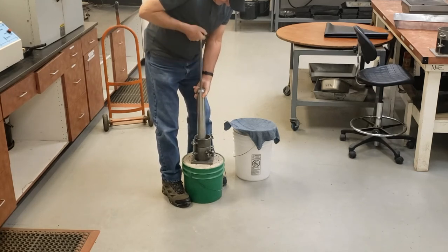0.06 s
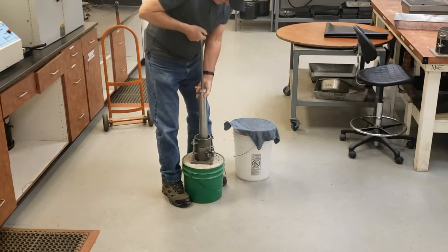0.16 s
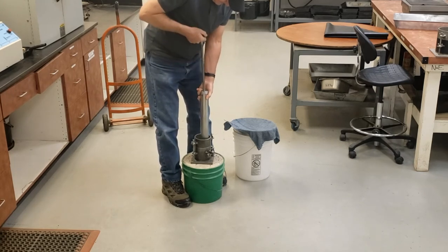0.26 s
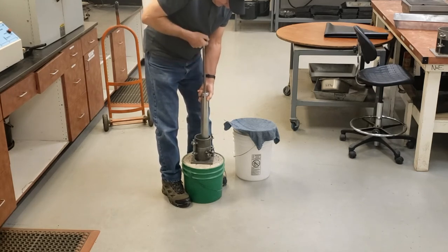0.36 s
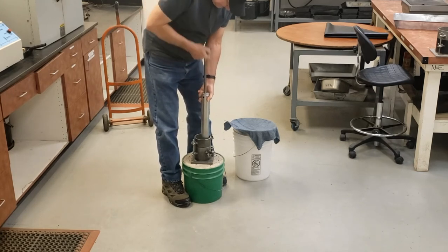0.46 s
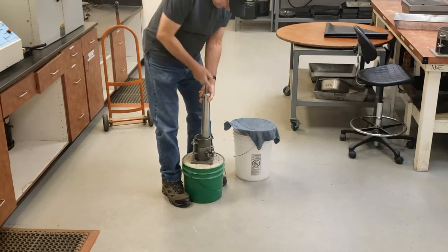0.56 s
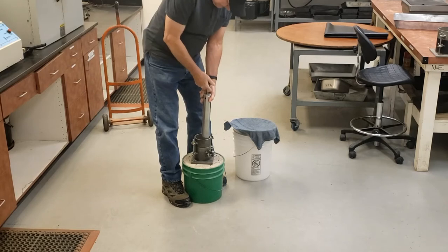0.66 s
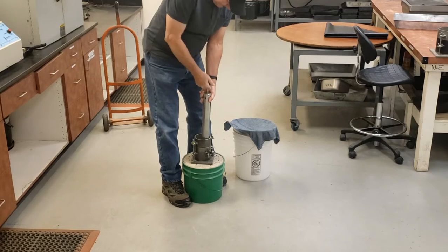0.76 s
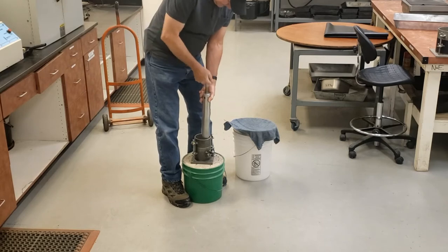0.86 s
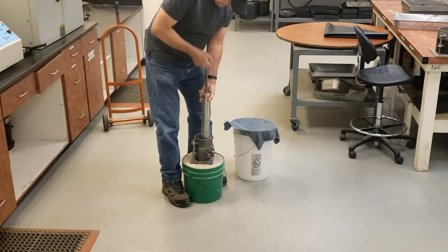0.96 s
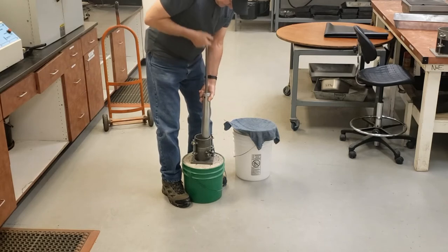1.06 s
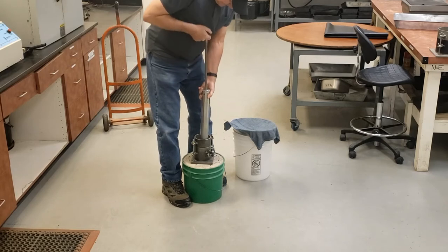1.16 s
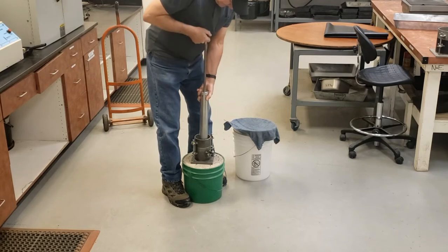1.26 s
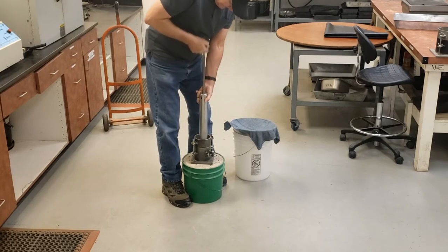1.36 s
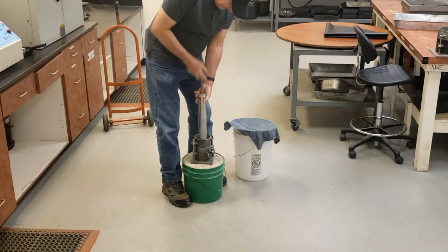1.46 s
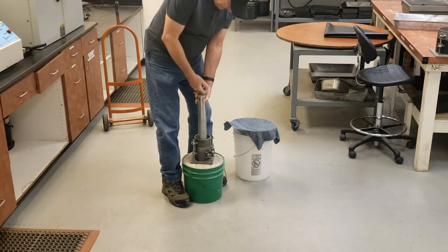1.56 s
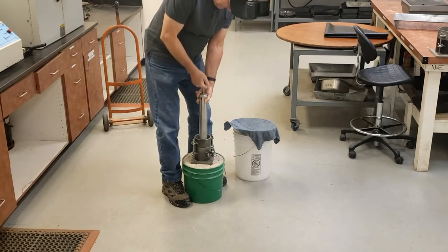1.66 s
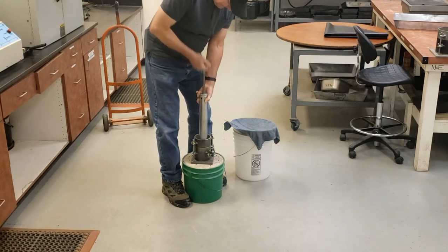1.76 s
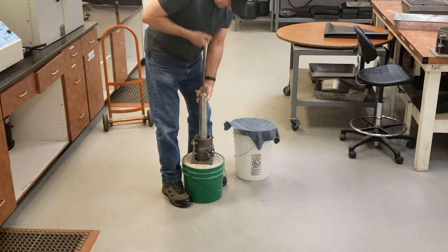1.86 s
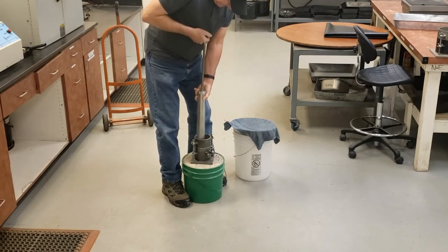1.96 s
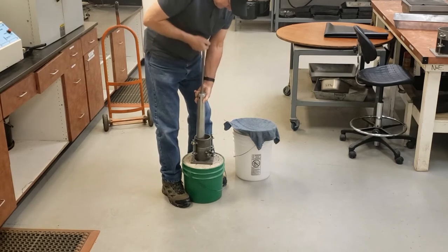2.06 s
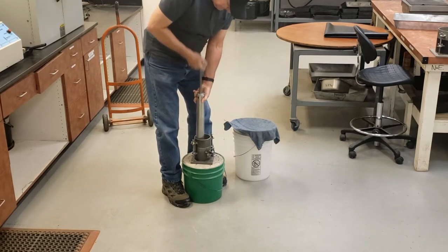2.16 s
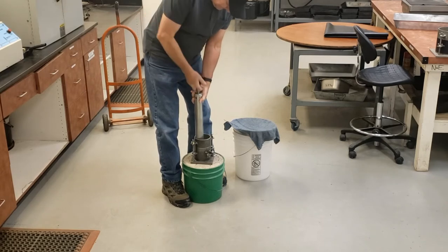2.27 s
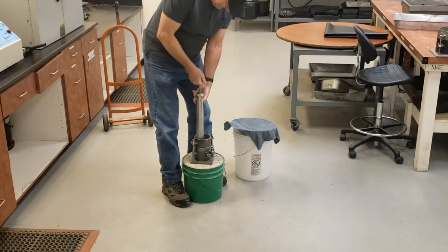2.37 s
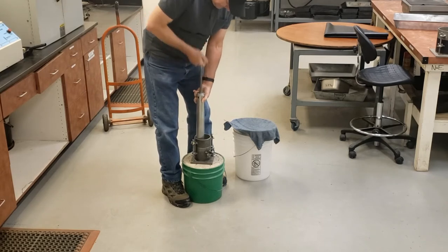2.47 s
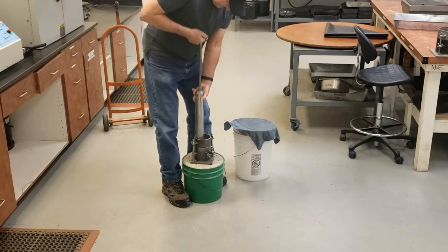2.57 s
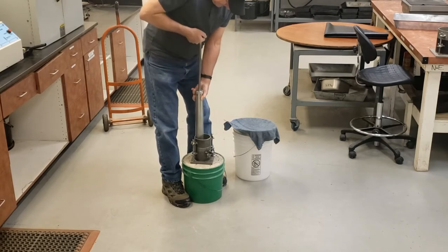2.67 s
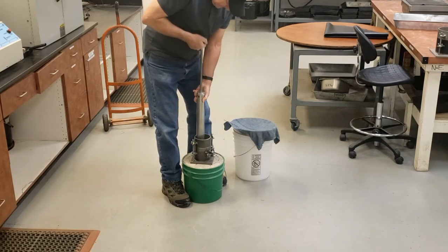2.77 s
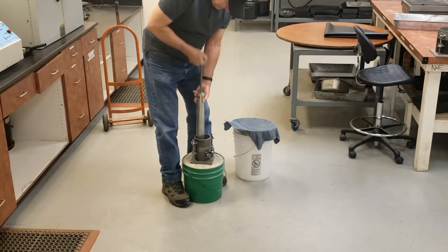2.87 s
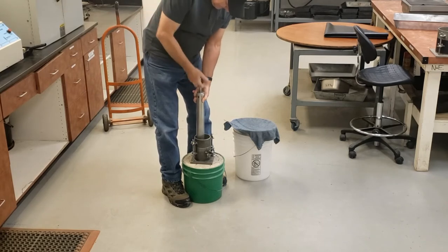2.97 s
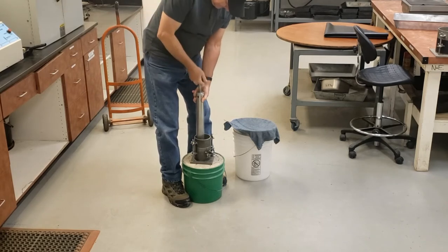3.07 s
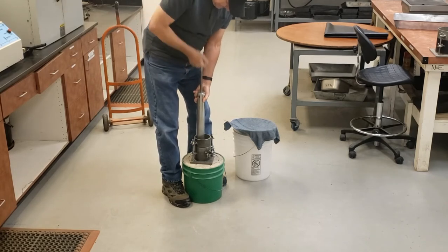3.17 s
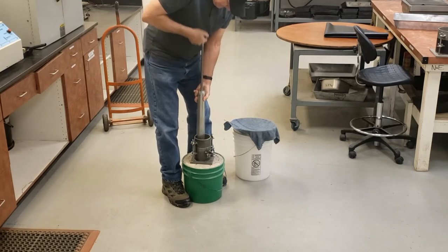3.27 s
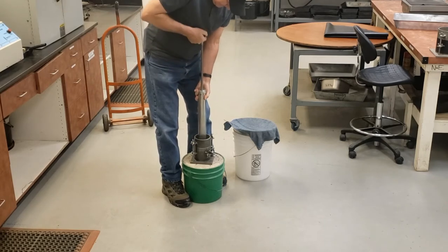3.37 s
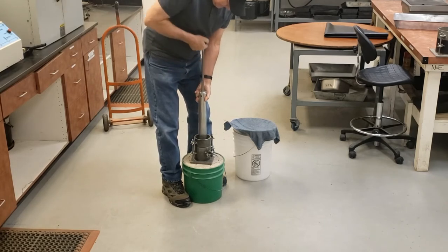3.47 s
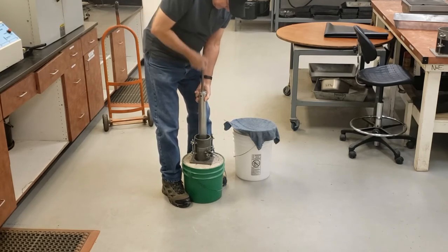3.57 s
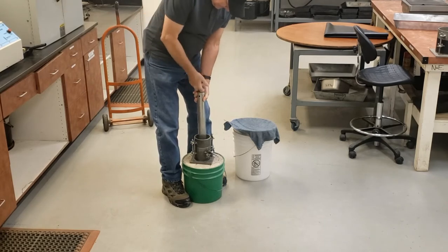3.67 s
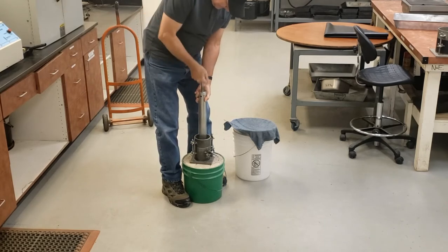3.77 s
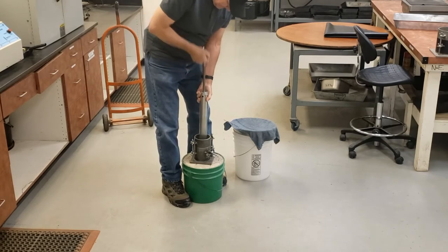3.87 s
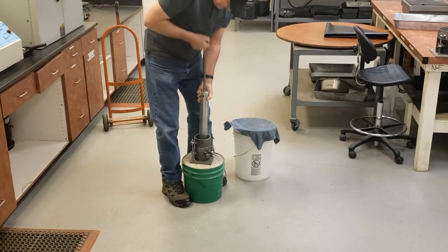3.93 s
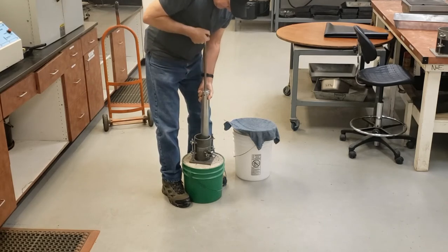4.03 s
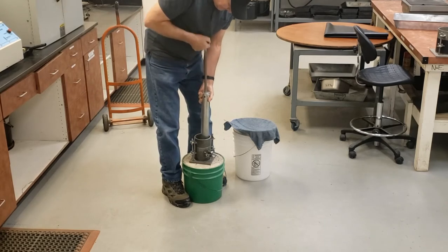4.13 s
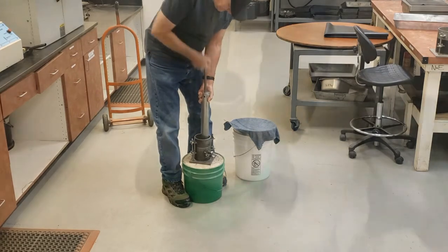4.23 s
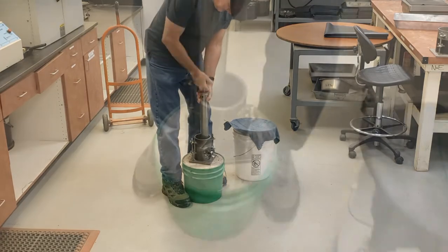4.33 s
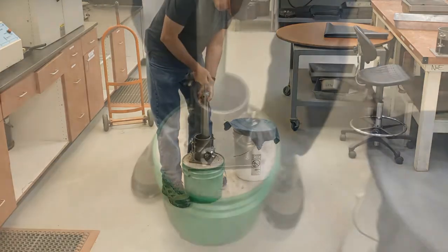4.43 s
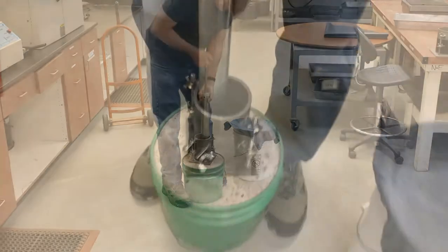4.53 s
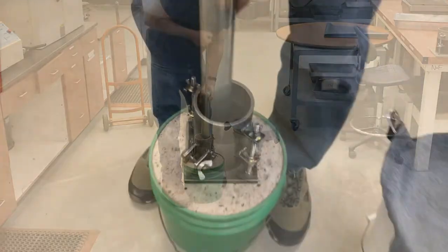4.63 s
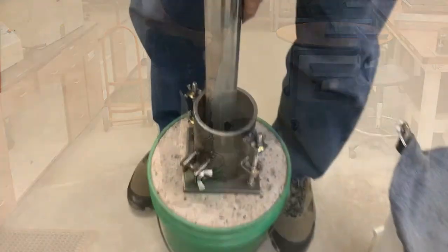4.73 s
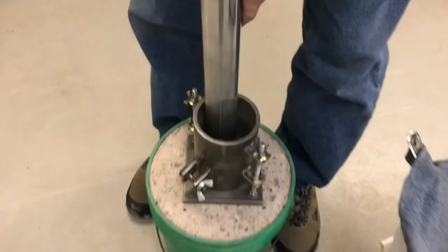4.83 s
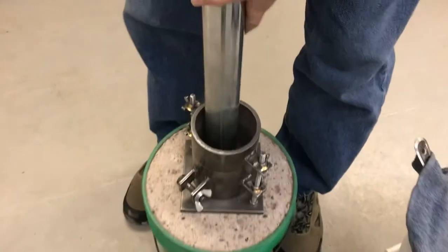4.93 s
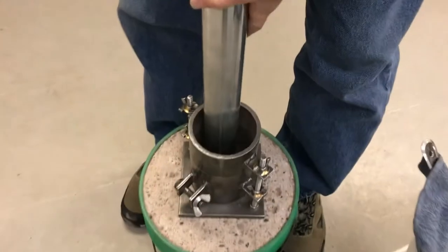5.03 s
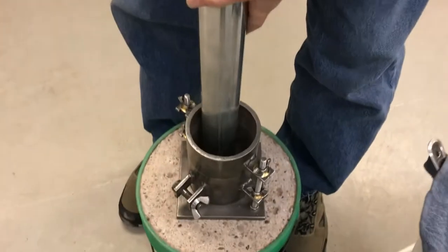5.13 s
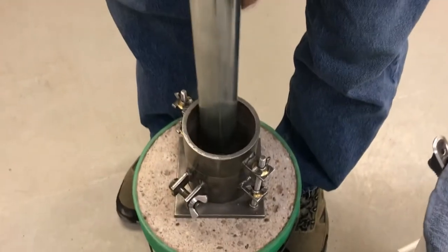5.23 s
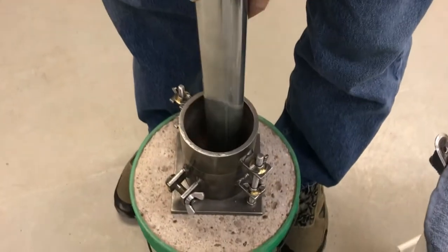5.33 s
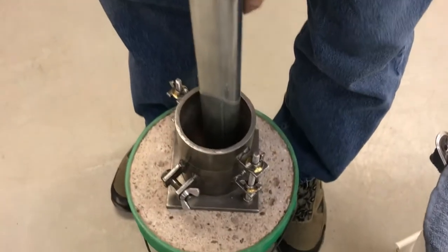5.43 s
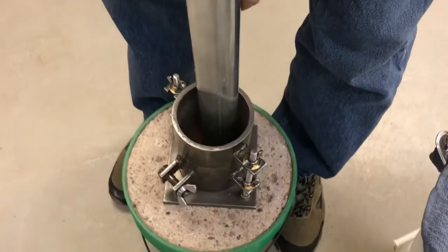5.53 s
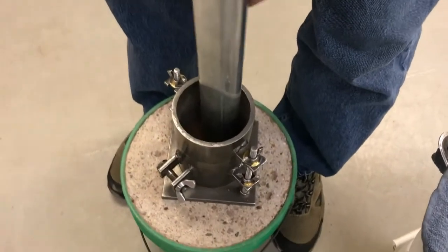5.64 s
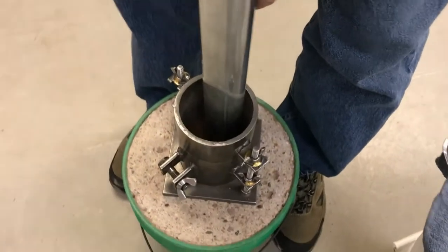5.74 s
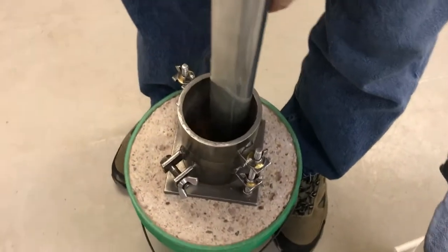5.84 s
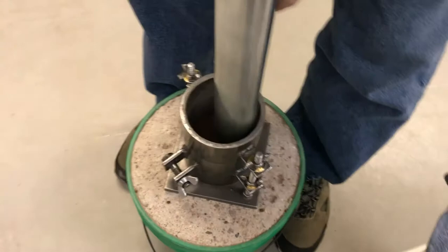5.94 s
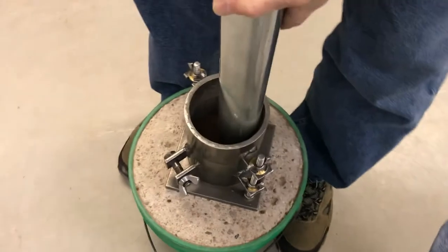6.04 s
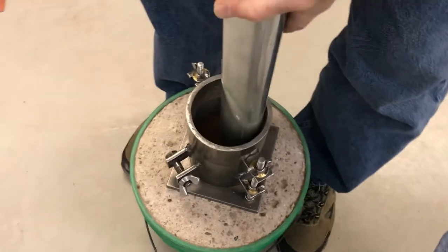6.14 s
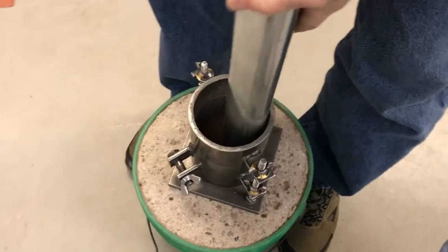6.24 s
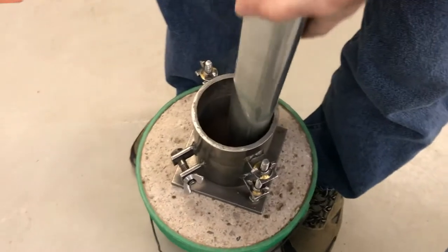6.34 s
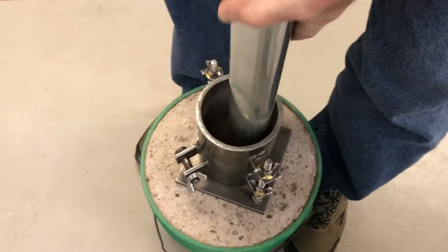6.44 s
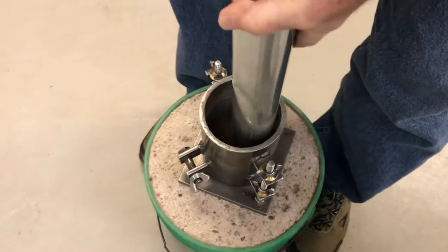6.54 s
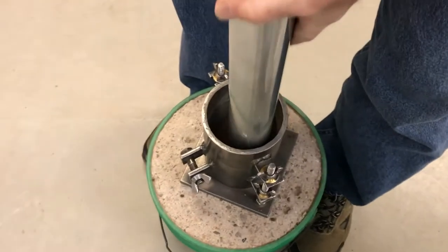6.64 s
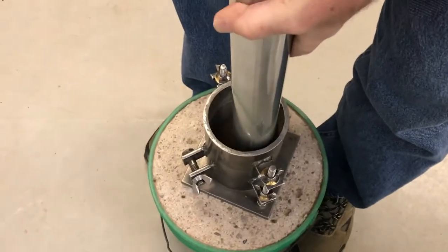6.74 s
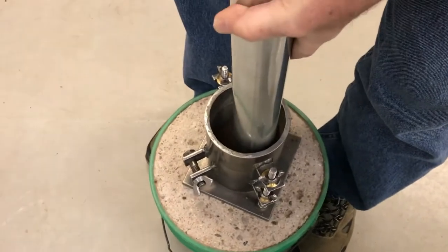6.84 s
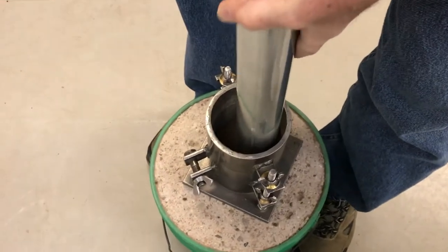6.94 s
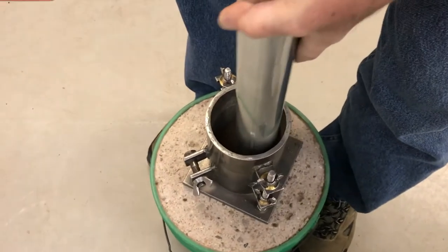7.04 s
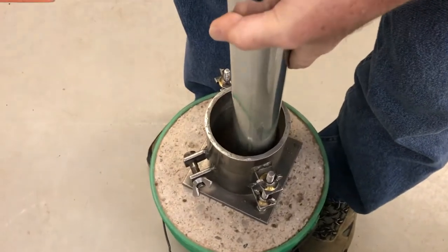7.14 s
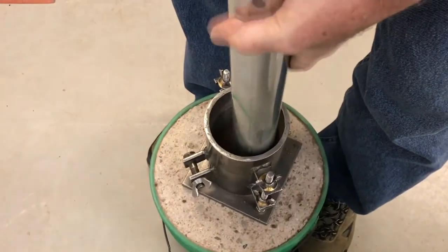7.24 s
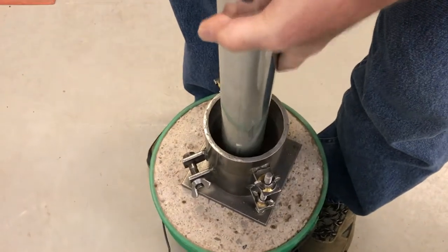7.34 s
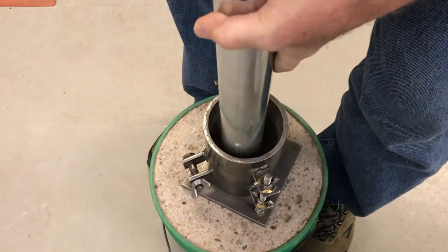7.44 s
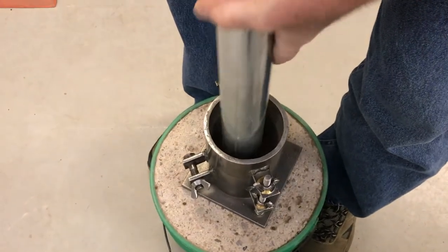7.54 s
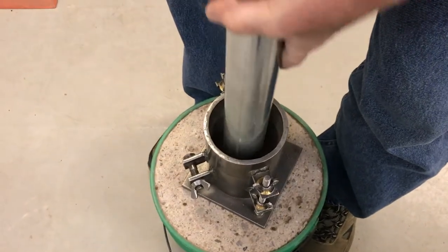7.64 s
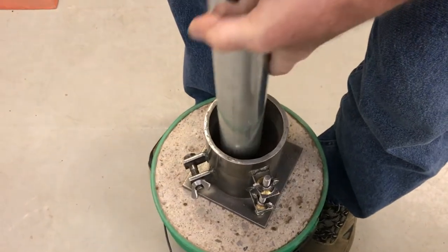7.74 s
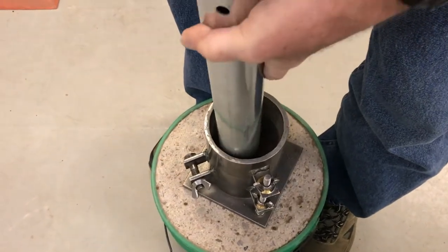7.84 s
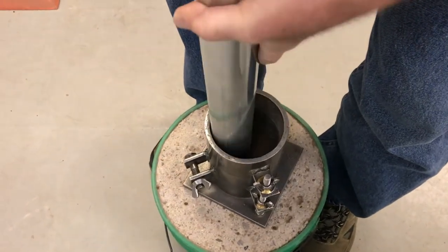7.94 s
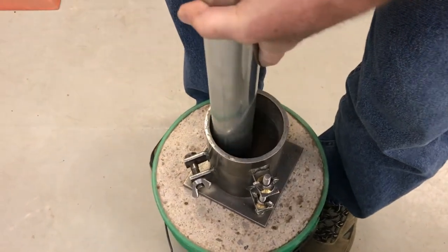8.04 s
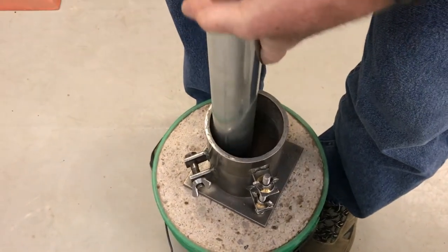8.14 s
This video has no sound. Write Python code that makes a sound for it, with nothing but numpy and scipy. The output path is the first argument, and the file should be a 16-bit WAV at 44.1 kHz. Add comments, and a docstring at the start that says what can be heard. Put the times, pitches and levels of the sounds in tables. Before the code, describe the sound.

Sharp steel clanks alternate with crunching thuds in an even rhythm as a sliding rammer weight is lifted and dropped onto soil in a metal mold. The first strokes sound wide and echoing from across a lab room, with a soft ventilation rumble underneath. Midway the microphone perspective fades to right above the mold, dry and mono, where the blows hit harder and the dusty scrapes, ticks and rattles stand out.

```python
"""A lab floor, where soil is compacted in a steel mold with a hand rammer, over ventilation noise.
Each cycle the weight scrapes up its guide tube, clanks against the cap, slides down, thuds on the soil
and rattles. About halfway the sound cross-fades between two microphone positions: across the room, wide
and reverberant, then just above the mold, dry and mono. A fast limiter flattens the loudest blows."""
import sys
import numpy as np
from scipy import signal
from scipy.fft import rfft, irfft, next_fast_len
from scipy.io import wavfile
from scipy.ndimage import uniform_filter1d, minimum_filter1d, map_coordinates

SR = 44100
rng = np.random.default_rng(int(sys.argv[2]) if len(sys.argv) > 2 else 0)


def wrap_up_sound(samples):
    """Save the sound to the file named by the first command line argument, as 16-bit audio."""
    columns = np.atleast_2d(samples).T
    # keep every value between -1 and 1, then stretch to whole-number steps
    tamed = np.clip(columns, -1, 1)
    steps = np.round(tamed * 32767).astype(np.int16)
    wavfile.write(sys.argv[1], SR, steps)


N = 361619
T = np.arange(N) / SR
AGE = np.arange(SR // 3) / SR  # time since a blow [s]

# the weight hits the cap: (time [s], level [dB], chatter length [s], bump of the tube on the soil [dB],
# boost of the high overtone [dB], upstroke length [s], upstroke scrape [dB])
CAP_HITS = [(0.01, -9, 0.012, -54, 2, 0.11, -64), (1.137, -6, 0.015, -58, 4, 0.2, -57),
            (1.927, -7, 0.014, -46, -2, 0.35, -56.5), (2.61, -7.5, 0.024, -53, 4.5, .2, -57.5),
            (3.32, -6.5, 0.013, -44, 0, 0.29, -50), (4.022, -7.5, 0.0055, -50, 0, 0.16, -50),
            (4.586, -7.5, 0.035, -48, 0, 0.193, -40), (5.245, -1, 0.029, -19.5, 3.5, .14, -32.5),
            (5.939, -5, 0.024, -40, 5, 0.084, -29.5), (6.637, -7, 0.027, -25, 6.5, 0.11, -31.5),
            (7.294, -7, 0.023, -18, 13.5, 0.12, -36), (7.933, -6, 0.025, -3.5, 15, .18, -39)]
# the weight lands: (time [s], level [dB], relative knock [dB], thump pitch [Hz], relative ring [dB])
SOIL_HITS = [(0.6388, -16.5, -15, 152, -7), (1.5669, -11.5, -12.5, 135, -14),
             (2.2995, -10.5, -17, 138, -6.5), (3.021, -14, -7, 139.7, -13), (3.692, -12, -6.5, 151, -20),
             (4.2752, -13, -12, 245, -8), (4.353, -11.5, -11.5, 125, -14), (4.9331, 1.5, -15.5, 251, -6.5),
             (5.6262, 2, -13.5, 263, -16), (6.2808, 0, -16, 236, -0.5), (6.967, 1.5, -16, 262, -9),
             (7.5861, 1.5, -15, 270, -3.5)]
# modes of weight and tube: (frequency [Hz], relative level [dB], t60 before added damping [s])
STEEL_MODES = [(242.2, -21, 0.21), (577, -24, 0.23), (895, -27, 0.15), (1434.5, -2.5, 0.15),
               (1486, -9.5, 0.15), (1620, -13, 0.12), (2142, -2, 0.045), (3154, 3, 0.058),
               (3420, -22, 0.13), (3675, 1.5, 0.12), (3621, 2, 0.09), (4230, -18, 0.13), (4490, -1, 0.048),
               (4874, 1, 0.07), (4928, -6.5, 0.15), (5980, -18.5, 0.15), (6350, -0.5, 0.13),
               (7880, -12, 0.061), (9080, -5, 0.083), (9880, -3, 0.069), (11590, -1, 0.063),
               (11700, -3, 0.046), (14600, -7, .08), (15200, -26, .1)]
# noise of steel hitting steel: (frequency [Hz], relative density [dB])
CLATTER_SPECTRUM = [(100, -13.5), (500, -9), (1000, -8.5), (1500, 5.5), (2600, -2), (3600, 4.5),
                    (5000, -1.5), (7500, -6), (10000, -7.5), (15500, -3)]
# noise of crushed soil and sand: (frequency [Hz], relative density [dB])
GRIT_SPECTRUM = [(100, -8), (500, 2), (900, -3.5), (1500, 4), (4000, -0.5), (8000, -7), (15500, -1)]

CROSSFADE_START_S, CROSSFADE_LENGTH_S = 4.205, 0.42  # from the distant view to the close one


def clanks():
    """The weight chatters against the cap, feeding the steel's modes, and then lets them ring."""
    out = np.zeros(N)
    for s, db, chatter_s, bump_db, overtone_db, *_ in CAP_HITS:
        since_chatter = np.maximum(AGE - chatter_s, 0)
        tone = ring(STEEL_MODES, scatter_db=2.24, blur=0.0063, detune=0.0011)
        tone /= fade(np.minimum(AGE, chatter_s), 0.11)  # chatter works against the decay
        tone *= fade(since_chatter, 0.16)  # the hand damps the tube
        clatter = noise(CLATTER_SPECTRUM, len(AGE))
        clatter *= amp(-11) * fade(since_chatter, 0.11) + amp(5) * fade(AGE, 0.0057)
        # one overtone depends on where the weight seats; the upper mids are stronger above the tube
        presence_db = 4 * np.interp(s, T, close_share())
        colour = lambda hz: amp(overtone_db * bell(hz, 9200, 0.04) + presence_db * bell(hz, 4480, 0.41))
        add(out, s, amp(db) * filtered(tone + clatter, colour) + amp(bump_db) * thump(67, t60=0.047))
        graze = noise(CLATTER_SPECTRUM, 260) * np.linspace(0, 1, 260) ** 2
        add(out, s - len(graze) / SR, amp(db - 32) * graze)  # it grazes the cap just before it seats
    return out


def landings():
    """Soil crunches and gives under the weight; the mold knocks and the steel rings briefly."""
    # the mold on its base: (frequency [Hz], relative level [dB], t60 [s])
    mold_modes = [(114.5, -9.5, 0.41), (198, 3, 0.076), (249.5, -6.5, 0.052), (346.7, -13, 0.17),
                  (606, -18, 0.28), (648, -7, 0.043)]
    out = np.zeros(N)
    for s, db, knock_db, hz, ring_db in SOIL_HITS:
        knock = amp(1) * thump(hz, t60=0.049) + amp(-12) * thump(0.738 * hz, t60=0.14)
        knock += amp(-3) * ring(mold_modes, scatter_db=-3, blur=0.048)
        crunch = noise(GRIT_SPECTRUM, len(AGE)) * fade(AGE, 0.042)
        steel = ring(STEEL_MODES, scatter_db=10.5, blur=0.037, detune=0.0152) * fade(AGE, 0.66)
        blow = amp(knock_db + 4.5) * knock + amp(-6.5) * crunch + amp(ring_db) * steel
        add(out, s, amp(db) * blow * (1 - np.exp(-AGE / 0.0012)))
    return out


def taps():
    """Lighter steel knocks and clicks, damped by the hand; each spot brings out its own band of modes."""
    # rattles, bounces off the cap, the click of a landing: (time [s], level [dB], boosted band [Hz])
    light_knocks = [(1.4037, -23.5, 2100), (1.7389, -26.5, 3600), (2.392, -28.5, 3080), (3.7524, -21, 3650),
                    (4.2757, -16, 1470), (4.4371, -16, 3200), (4.6828, -14.5, 3700), (4.8788, -20, 3620),
                    (4.9472, -4, 3270), (5.0072, -11.5, 3680), (5.0433, -9.5, 3670), (5.1006, -14.5, 3150),
                    (5.6832, -7.5, 3730), (5.7388, -13, 3660), (5.7928, -19, 1450), (6.0352, -17.5, 4170),
                    (6.251, -20, 3580), (6.2883, 0, 1500), (6.2984, -5, 1530), (6.353, -15.5, 3600),
                    (6.4024, -6, 3660), (7.0413, -7.5, 1490), (7.0874, -13, 3550), (7.2208, -21, 3920),
                    (7.416, -20.5, 1430), (7.5146, -20, 1560), (7.644, -12, 3550), (7.7074, -10, 3723),
                    (8.0486, -17, 4050)]
    # colour of a light knock: (frequency [Hz], gain [dB])
    knock_colour = [(200, 10), (1450, 1), (2200, -1), (3600, 1), (5000, -2), (9000, 0), (15000, 4)]
    out = np.zeros(N)
    for s, db, spot_hz in light_knocks + faint_ticks():
        tick = amp(-6) * noise(CLATTER_SPECTRUM, len(AGE)) * fade(AGE, 0.053)
        steel = amp(-4.5) * ring(STEEL_MODES, scatter_db=5.5, blur=0.019, detune=0.01) * fade(AGE, 0.17)
        contact = (tick + steel) * (1 - np.exp(-AGE / 0.0009))
        colour = lambda hz: amp(along(knock_colour, hz) + 7 * bell(hz, spot_hz, 0.087) - 1.5)
        db_per_octave = 2.5 + 0.13 * db  # harder is brighter
        add(out, s, amp(db) * filtered(contact, lambda hz: colour(hz) * tilt(hz, db_per_octave)))
    return out


def faint_ticks():
    """The loose weight brushes the wall in mid-stroke and as it settles: (time [s], level [dB], band [Hz])."""
    # rings that a tick may bring out: (frequency [Hz])
    spots_hz = [1450, 3420, 3830]
    graze_db, settle_db, scatter_db = 8, -21, -6  # against the scrape; against the landing; random spread
    windows = [(s - 0.09, s - 0.03, scrape_db + graze_db) for s, *_, scrape_db in CAP_HITS[1:]]
    windows += [(s - 0.09, s - 0.03, fall_db(s) + graze_db) for s, *_ in SOIL_HITS]
    windows += [(s + 0.085, s + 0.2, db + settle_db) for s, db, *_ in SOIL_HITS]
    return [(rng.uniform(start, end), db + scatter_db * rng.standard_normal(), rng.choice(spots_hz))
            for start, end, db in windows]


def slides():
    """Dusty steel scrapes on steel; sand grains catch and make the tube tick."""
    # sliding friction: (frequency [Hz], relative density [dB])
    scrape_spectrum = [(200, -7.5), (800, -2), (1500, 0), (2600, -1), (3700, 0.5), (5500, -0.5),
                       (7500, -2.5), (11500, 2), (15500, -5.5)]
    roughness = amp(2.2 * wobble(45) + 1.9 * wobble(440))
    rub = unit(roughness * noise(scrape_spectrum, N))
    ticking = np.zeros(N)
    for _ in range(12):  # each spot on the tube answers with its own colour
        catches = (rng.random(N) < 10 / SR) * rng.uniform(0.3, 1, N)  # about ten a second
        steel = ring(STEEL_MODES, scatter_db=7.5, blur=0.017, detune=0.117) * fade(AGE, 0.077)
        grit = amp(-3) * noise(GRIT_SPECTRUM, len(AGE)) * fade(AGE, 0.0089)
        ticking += signal.oaconvolve(catches, steel + grit)[:N]
    ticking = filtered(ticking, lambda hz: tilt(hz, db_per_octave=-0.5))
    return strokes() * (amp(-3) * rub + amp(-1) * unit(ticking))


def strokes():
    """The scrape follows the weight's speed: pulled up before a clank, falling freely before a landing."""
    slack_s, speed_up_s, fall_s, last_release_s = 0.1, 0.037, 0.17, 8.125
    out = np.zeros(N)
    for s, *_, lift_s, scrape_db in CAP_HITS:  # the hand takes up the weight, then pulls at a steady speed
        corners = np.array([-slack_s, 0, speed_up_s, lift_s]) + s - lift_s
        out += amp(scrape_db) * np.interp(T, corners, [0, 0.32, 1, 1], right=0)
    for s in [s for s, *_ in SOIL_HITS] + [last_release_s + fall_s]:
        speed = np.interp(T - s, [-fall_s, 0], [0, 1], right=0)
        out += amp(fall_db(s)) * np.sqrt(speed)  # power grows with speed
    return out


def fall_db(s):
    """Scrape level of a fall that ends at time s: louder in the close view."""
    far_db, near_db = -51, -36.5
    return far_db + (near_db - far_db) * np.interp(s, T, close_share())


def ring(modes, scatter_db, blur, detune=0.0057):
    """Decaying modes; grip and contact vary their strength and tuning at each blow and blur their pitch."""
    hz, db, t60 = np.transpose(modes)[:, :, None]
    gain = amp(db + scatter_db * rng.standard_normal(hz.shape))
    hz = hz * (1 + detune * rng.standard_normal(hz.shape))
    stray = rng.standard_normal((len(hz), len(AGE) // 200 + 1))
    stray = np.repeat(stray, 200, axis=1)[:, :len(AGE)]
    cycles = rng.random(hz.shape) + np.cumsum(hz * (1 + blur * stray), axis=1) / SR
    return np.sum(gain * fade(AGE, t60) * np.sin(2 * np.pi * cycles), axis=0) / np.linalg.norm(gain)


def thump(hz, t60):
    """One heavily damped bounce of a mass on the soil."""
    return np.sin(2 * np.pi * hz * AGE) * fade(AGE, t60)


def room(x, early_db, early_t60):
    """Room reverberation: floor and cabinets answer at once, the walls linger."""
    # the lab's decay: (frequency [Hz], t60 [s])
    reverb_times = [(100, 1), (400, 1), (1500, 0.67), (4000, 0.75), (8000, 0.54), (15000, 0.3)]
    out, step = np.zeros((2, N + 2 * SR)), SR // 3
    for start in range(0, N, step):  # a fresh random tail every third of a second, for an even colour
        hz, t, spectra = signal.stft(rng.standard_normal((2, SR * 3 // 4)), SR, nperseg=256)
        decay = fade(t, along(reverb_times, hz)[:, None]) + amp(early_db) * fade(t, early_t60)
        tail = signal.istft(spectra * decay, SR, nperseg=256)[1]
        wet = signal.fftconvolve(x[None, start:start + step], tail / np.linalg.norm(tail[0]), axes=1)
        out[:, start:start + wet.shape[1]] += wet
    return diffuse(out[:, :N])


def room_tone():
    """Ventilation noise over a slowly swelling rumble."""
    # ventilation: (frequency [Hz], relative density [dB])
    vent_spectrum = [(20, -26), (50, -4.5), (100, 0), (200, -9), (400, -13.5), (1000, -26), (4000, -28),
                     (15000, -38)]
    # swell of the low room noise: (time [s], level [dB])
    rumble_levels = [(0, -45), (1.5, -45), (1.9, -40.5), (2.4, -41.5), (2.8, -43), (4, -47), (6, -54),
                     (8.2, -62)]
    vent = amp(-54) * diffuse(np.array([noise(vent_spectrum, N), noise(vent_spectrum, N)]))
    rumble = noise([(15, -34), (27, -32), (38, -4.5), (55, -3), (90, -8.5), (160, -22), (400, -58)], N)
    swell_db = np.interp(T, *np.transpose(rumble_levels)) + 3.3 * wobble(5.29)
    return vent + rumble * amp(swell_db)


def diffuse(pair):
    """Two unrelated signals as a diffuse field at the microphone: left and right alike in the bass only."""
    # likeness of left and right: (frequency [Hz], correlation [0..1])
    likeness = [(100, 0.82), (300, 0.89), (700, 0.31), (1500, 0.15), (10000, 0.079)]
    angle = lambda hz: np.arccos(np.clip(along(likeness, hz), -1, 1)) / 2
    mid, side = filtered(pair, lambda hz: np.array([np.cos(angle(hz)), np.sin(angle(hz))]))
    return np.array([mid + side, mid - side])


def close_share():
    """Share of the close view in the cross-fade, per sample, from 0 to 1."""
    return np.clip((T - CROSSFADE_START_S) / CROSSFADE_LENGTH_S, 0, 1)


def amp(db):
    """Decibels to gain."""
    return 10 ** (np.asarray(db) / 20)


def unit(x):
    """Scale to rms 1."""
    return x / np.sqrt(np.mean(x ** 2) + 1e-20)


def along(points, hz):
    """Join (frequency [Hz], value) points on a log axis."""
    knots_hz, values = np.transpose(points)
    return np.interp(np.log(hz + 1), np.log(knots_hz + 1), values)


def fade(t, t60):
    """Exponential decay, 60 dB in t60 seconds."""
    return amp(-60 * t / np.maximum(t60, 1e-3))


def tilt(hz, db_per_octave):
    """A gain slope through 4 kHz, flat below 500 Hz."""
    return amp(db_per_octave * np.log2(np.maximum(hz, 500) / 4000))


def bell(hz, centre_hz, octaves):
    """A resonance-shaped hump of height 1 on a log axis."""
    return 1 / (1 + (np.log2((hz + 1) / centre_hz) / octaves) ** 2)


def filtered(x, response):
    """Filter x by a gain that is a function of frequency."""
    size = x.shape[-1]
    padded = next_fast_len(size + 4096)
    return irfft(rfft(x, padded) * response(np.fft.rfftfreq(padded, 1 / SR)), padded)[..., :size]


def noise(spectrum, size):
    """Noise of rms 1, coloured by (frequency [Hz], level [dB]) points."""
    return unit(filtered(rng.standard_normal(size), lambda hz: amp(along(spectrum, hz))))


def wobble(rate):
    """A smooth random curve, rate knots a second."""
    return map_coordinates(rng.standard_normal(int(N * rate / SR) + 4), [T * rate])


def add(track, s, sound):
    """Mix a sound in at time s."""
    start = max(0, round(s * SR))
    track[start:start + len(sound)] += sound[:max(0, N - start)]


def scene():
    """The rammer from across the room, wide and reverberant, cross-fades to a dry mono view at the mold."""
    # colour across the room: (frequency [Hz], gain [dB])
    far_colour = [(100, -2), (3500, 1.5), (6400, 6), (8000, 0.5), (14000, 2), (15400, 0.5), (16100, -7)]
    # colour just above the mold: (frequency [Hz], gain [dB])
    close_colour = [(100, 0.5), (1500, 0), (9000, -0.5), (11900, -7), (12700, -26), (13500, -42),
                    (16000, -60.5)]
    # reverberation that reaches the close position: (frequency [Hz], gain [dB])
    close_echo = [(60, -32), (150, -4), (400, -8), (1000, -8.5), (4000, -15.5), (10000, -17)]
    rammer = clanks() + landings() + taps() + slides()
    echo = room(rammer, early_db=10, early_t60=0.18)
    ambience = room_tone()
    direct = np.array([rammer, np.roll(rammer, 2)])  # the microphone's left side is nearer
    far = (amp(-8) * direct + amp(-1) * echo) * amp([[1.4], [-1.4]]) + ambience
    far = filtered(far, lambda hz: amp(along(far_colour, hz)))
    boom = filtered(echo[0], lambda hz: amp(along(close_echo, hz)))
    close = filtered(rammer + boom + ambience[0], lambda hz: amp(along(close_colour, hz)))
    share = close_share()
    return (1 - share) * far + share * close


def record(dry):
    """A fast look-ahead limiter holds the peaks; nothing is kept above the band limit."""
    far_ceiling_db, near_ceiling_db, top_hz = -3, -0.3, 16100
    ceiling = amp(far_ceiling_db + (near_ceiling_db - far_ceiling_db) * close_share())
    needed_gain = np.minimum(1, ceiling / (np.abs(dry).max(axis=0) + 1e-9))
    gain = uniform_filter1d(minimum_filter1d(needed_gain, size=64), size=64)
    return filtered(dry * gain, lambda hz: hz < top_hz)


dry = scene()
out = record(dry)
wrap_up_sound(out)
```